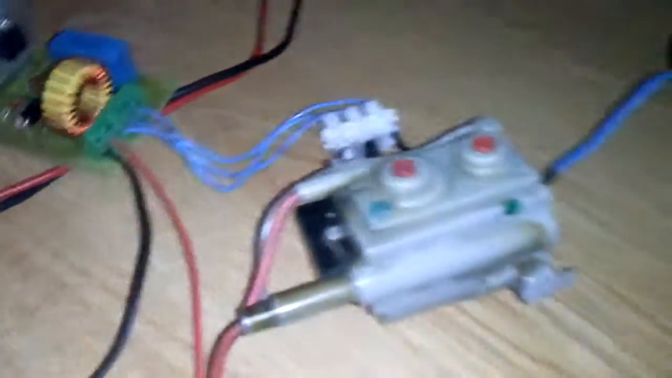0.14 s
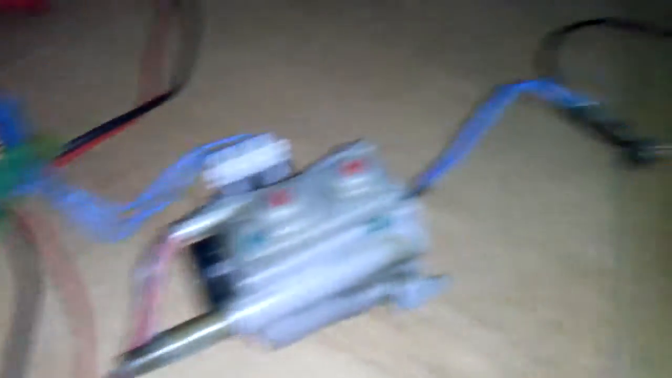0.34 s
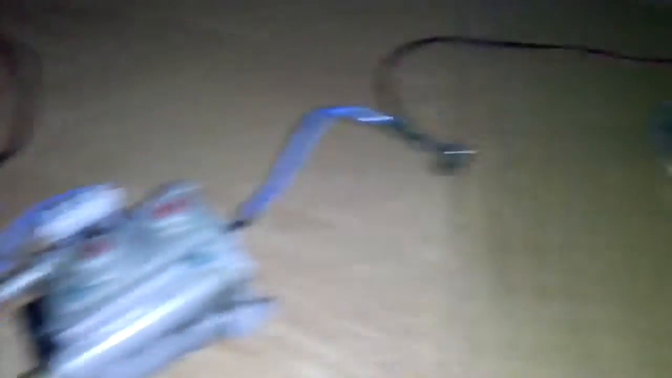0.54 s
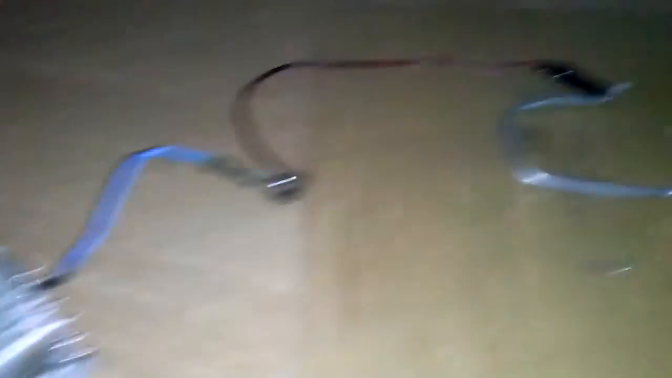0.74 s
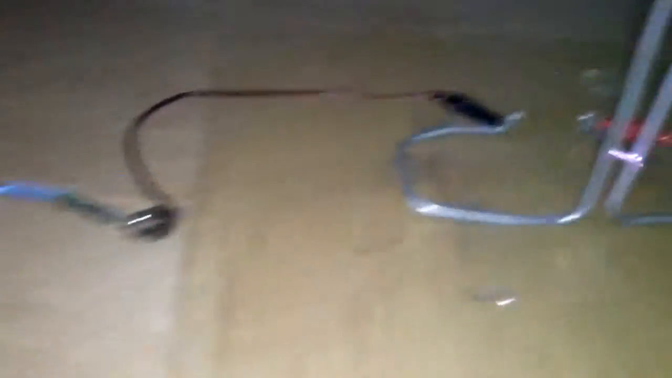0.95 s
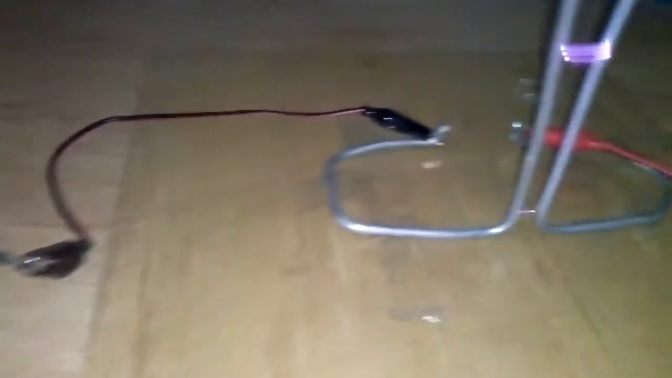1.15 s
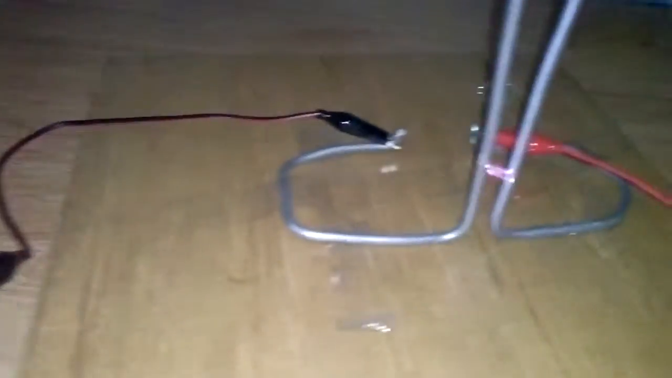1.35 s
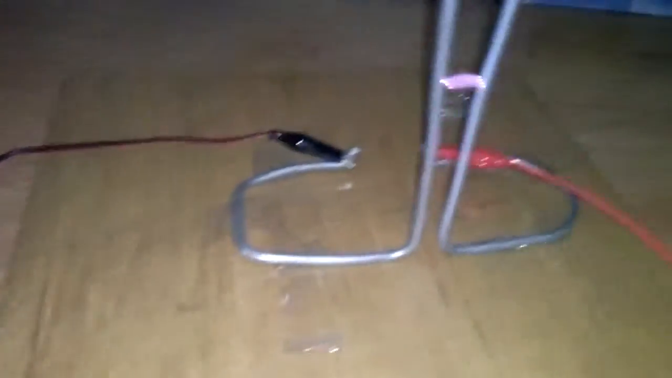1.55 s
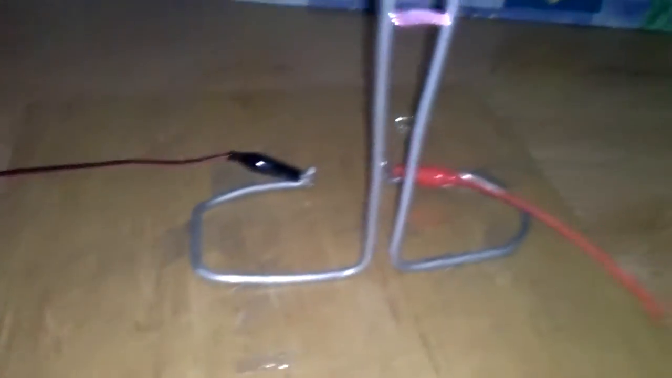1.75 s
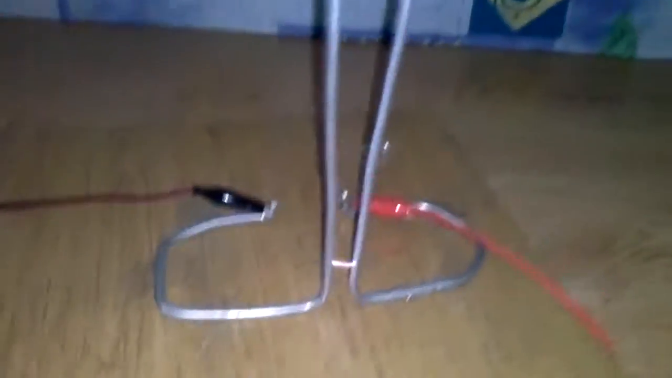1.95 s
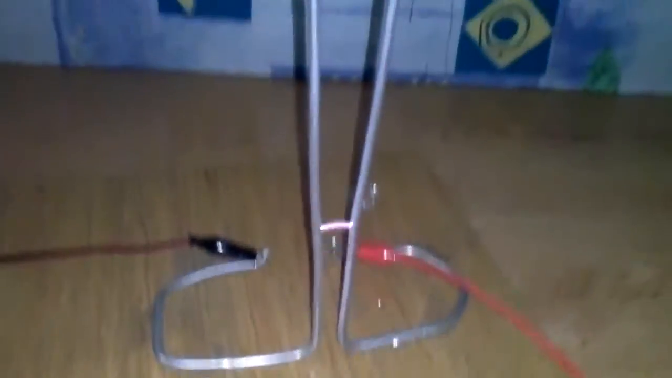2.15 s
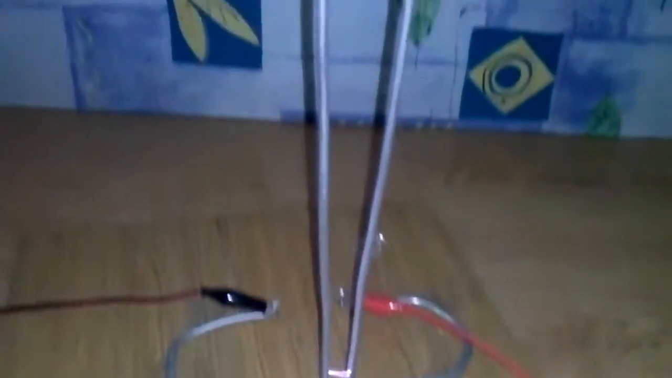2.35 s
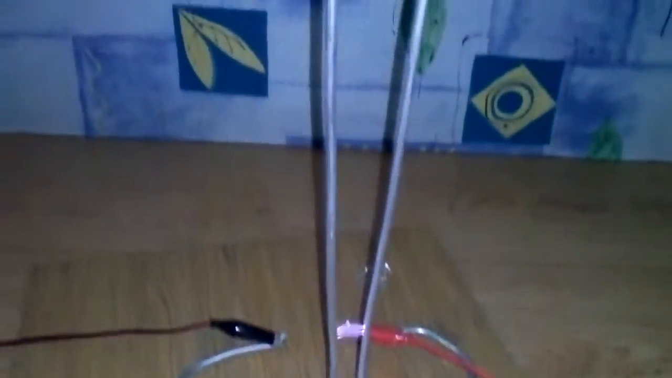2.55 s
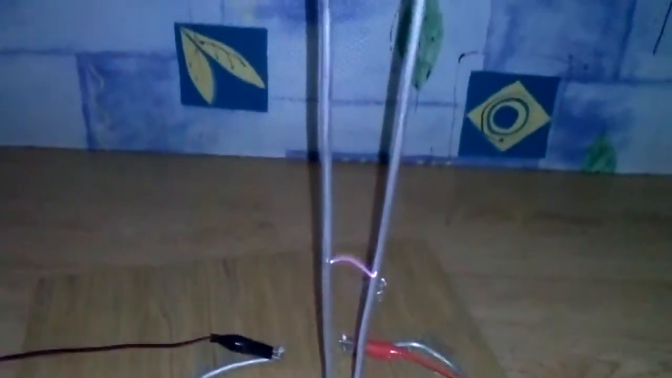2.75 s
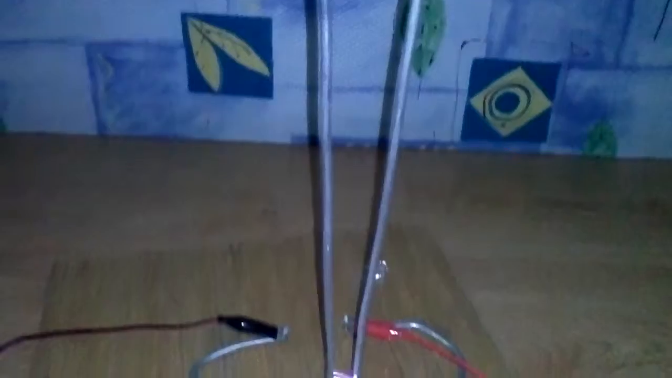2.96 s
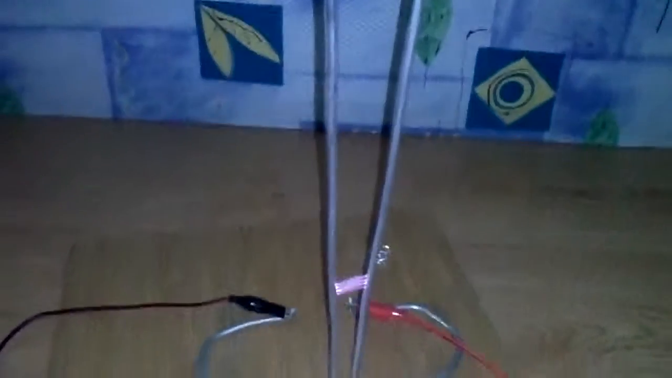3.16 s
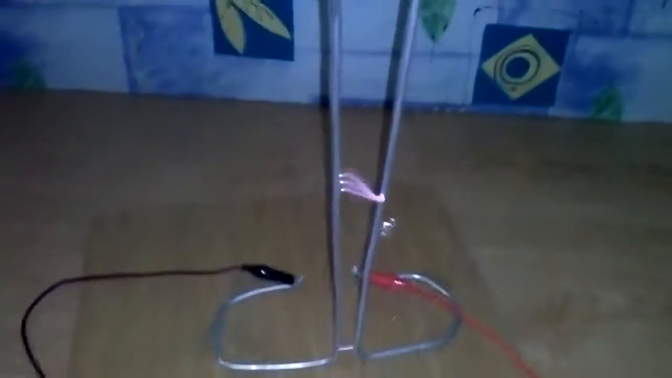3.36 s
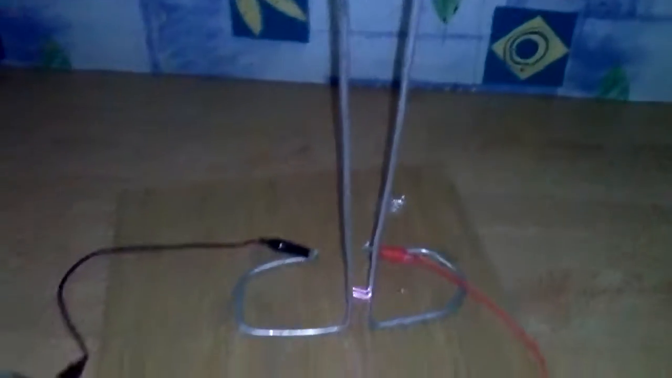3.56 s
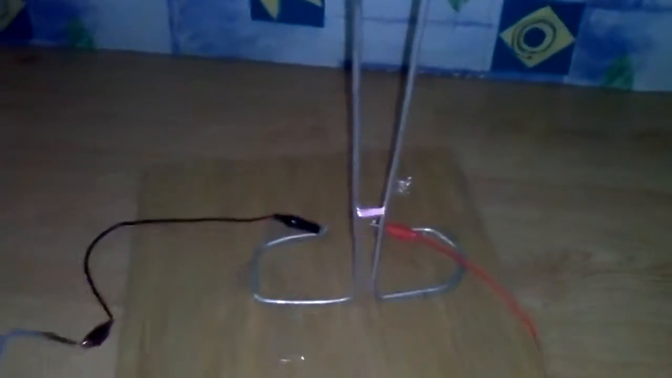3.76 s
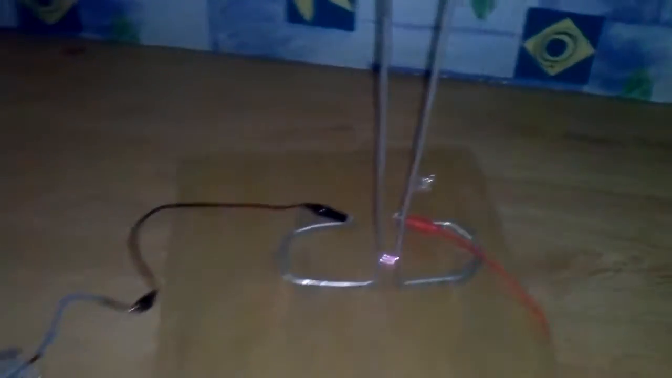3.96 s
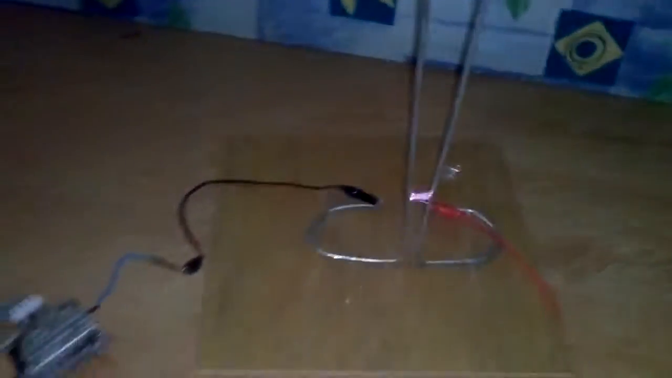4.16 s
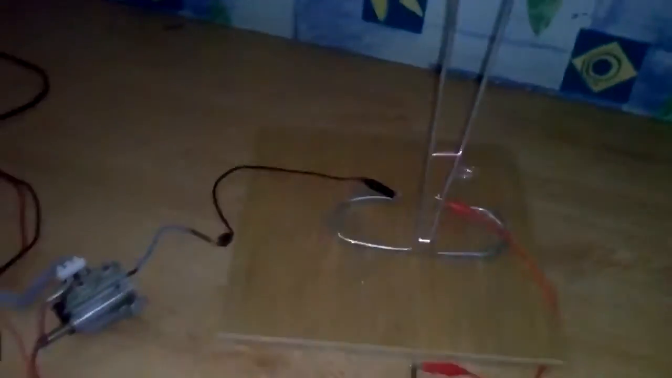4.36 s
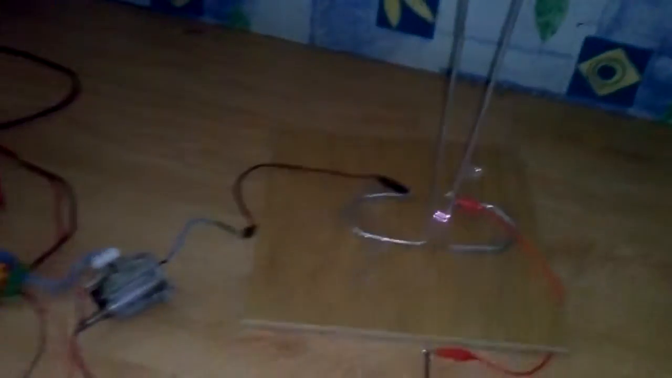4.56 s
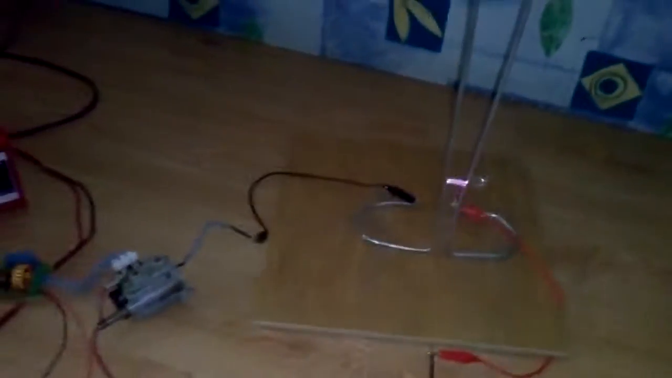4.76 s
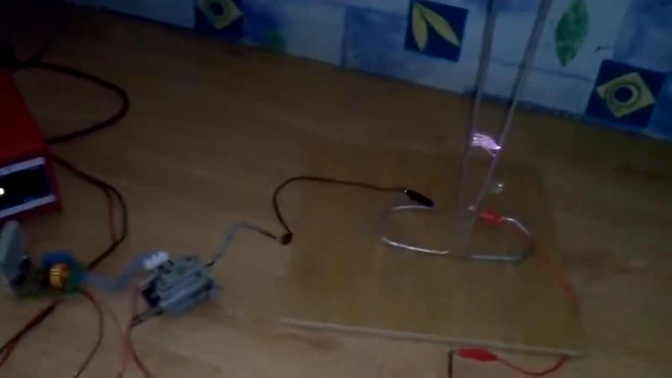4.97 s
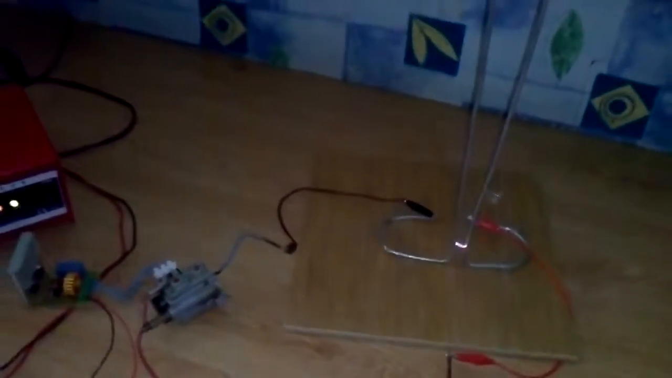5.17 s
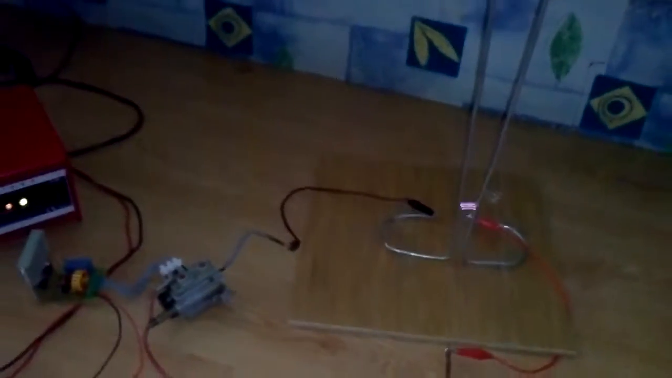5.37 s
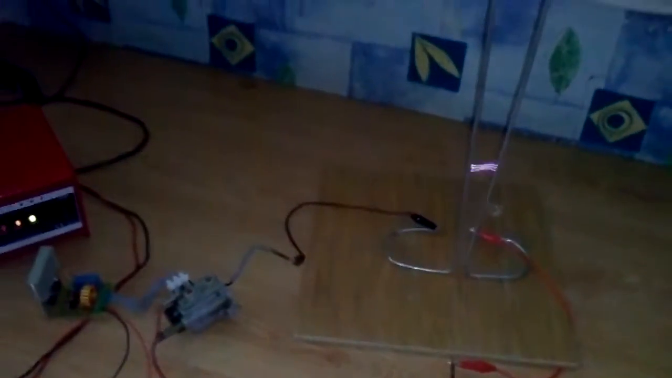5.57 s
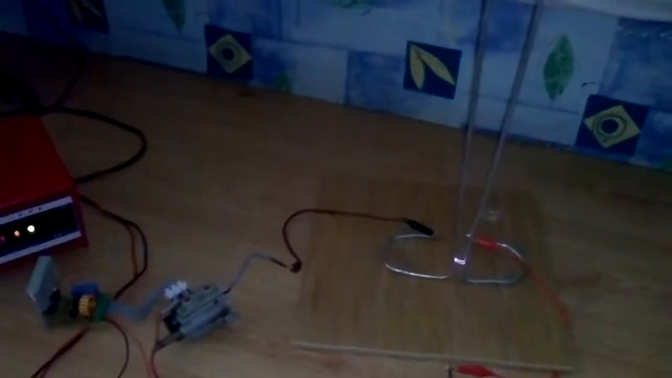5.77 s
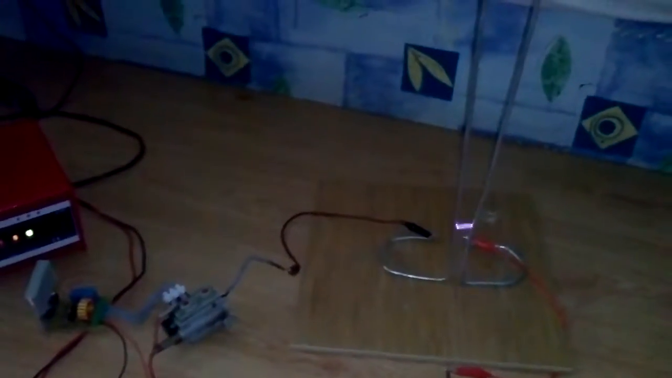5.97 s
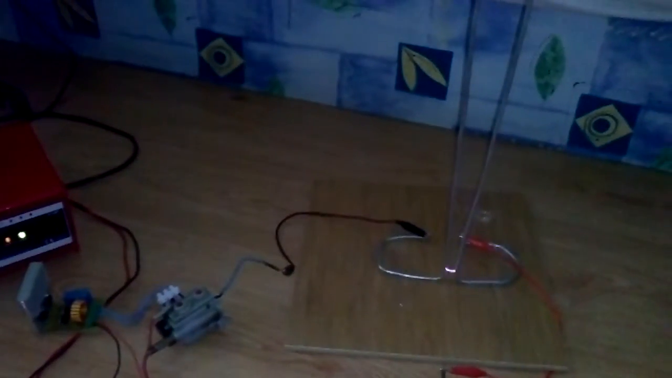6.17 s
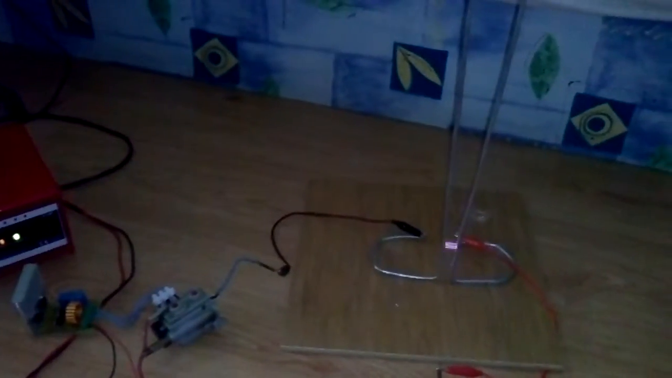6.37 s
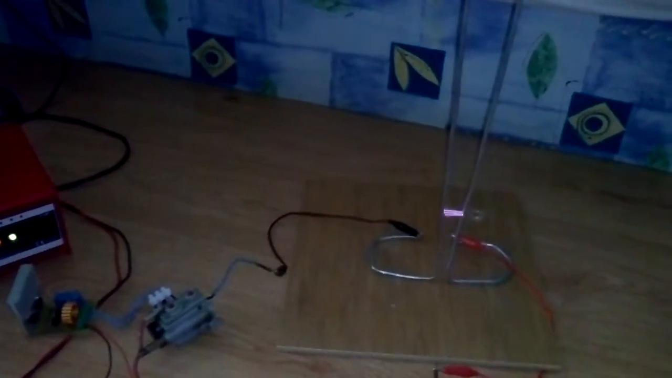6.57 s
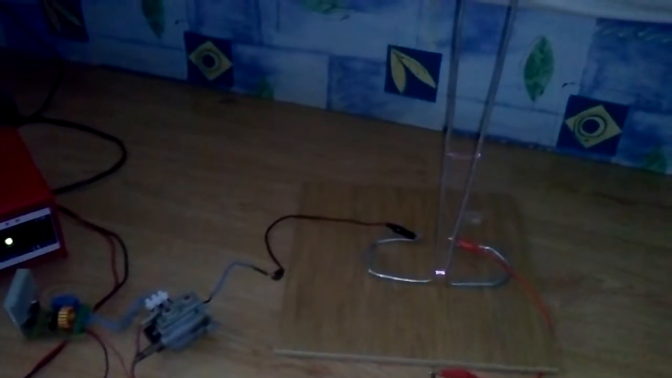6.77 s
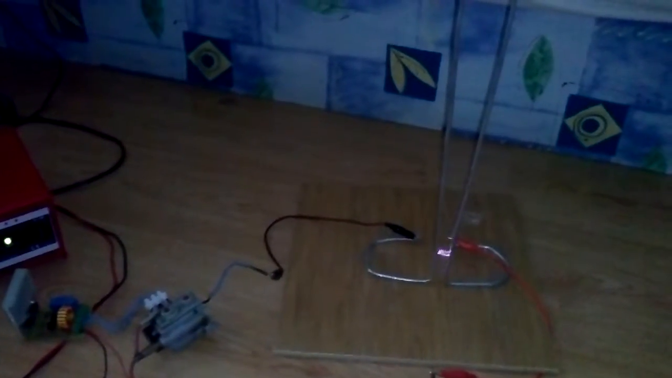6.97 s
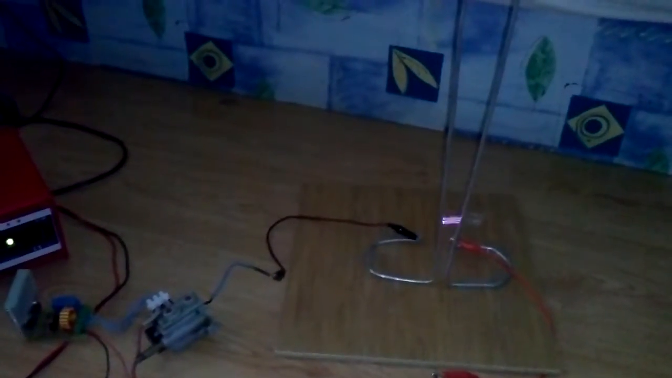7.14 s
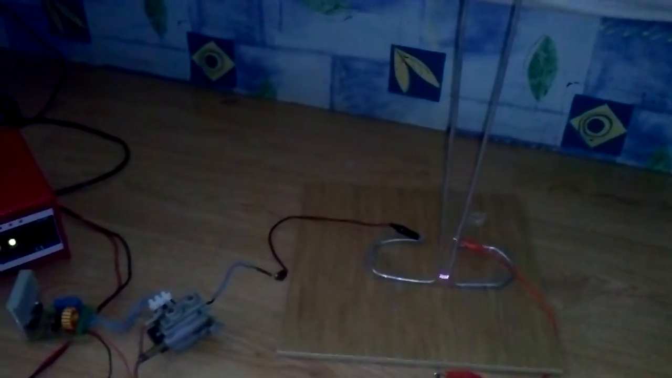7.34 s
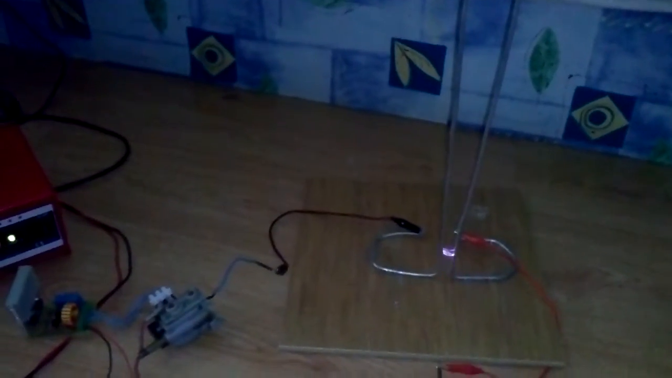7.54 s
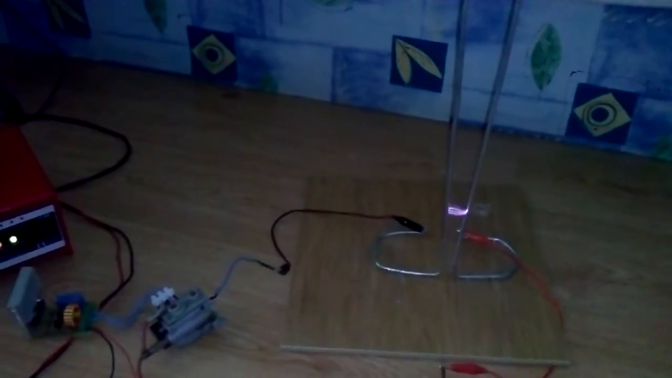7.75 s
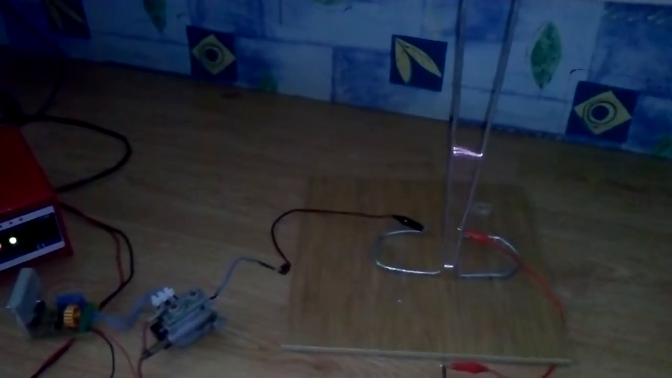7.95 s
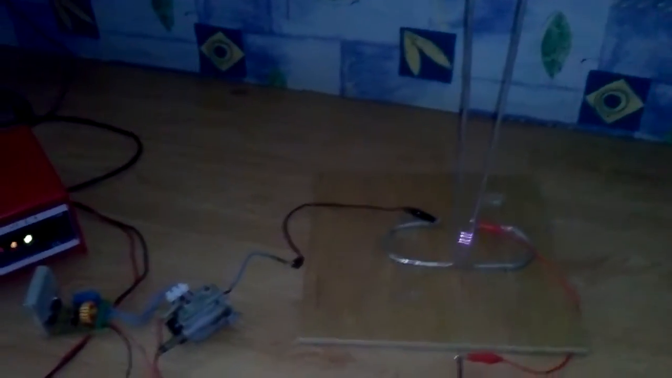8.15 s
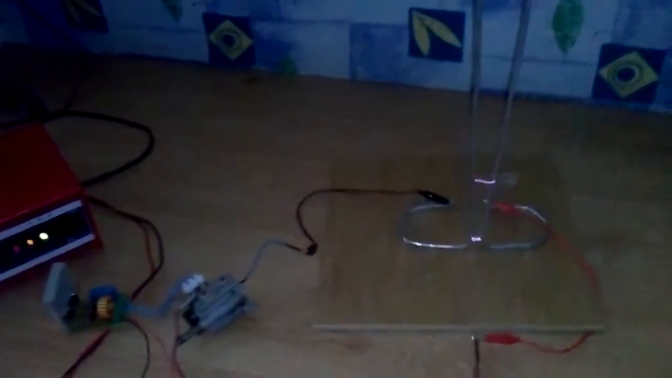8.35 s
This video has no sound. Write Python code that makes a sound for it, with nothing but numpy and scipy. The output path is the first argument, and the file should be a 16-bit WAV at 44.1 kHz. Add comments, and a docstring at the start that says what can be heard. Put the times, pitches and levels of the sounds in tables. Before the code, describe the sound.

An electric arc climbs between two upright wires with a harsh, crackling buzz. It grows louder and fuller as it stretches, sputters, breaks and at once restarts, roughly twice a second. A power supply hums faintly underneath. The sound is close at first, in a small room, then turns a little quieter and more echoing as the handheld microphone moves back, its tone shifting along the way.

```python
"""A harsh, crackling buzz swells, breaks off and starts again: an electric arc climbs two upright wires.
It snaps once every half cycle of the mains; a board, a wall and the room throw each snap back.
As the arc stretches it grows louder and fuller and sputters, then breaks and restarts at the bottom.
The power supply hums underneath. The tone shifts as the small camera that hears it moves and turns."""
import sys
import numpy as np
from scipy import signal
from scipy.io import wavfile
from scipy.ndimage import uniform_filter1d, map_coordinates

SR = 44100
rng = np.random.default_rng(int(sys.argv[2]) if len(sys.argv) > 2 else 0)


def digitize_waveform(pressure):
    """Quantize a signal to 16-bit integers and store it at the path in sys.argv[1].

    Rows of a 2-D input are taken as channels; values are limited to [-1, 1].
    """
    field = np.atleast_2d(pressure).T
    bounded = np.clip(field, -1, 1)
    quanta = np.round(bounded * 32767).astype(np.int16)
    wavfile.write(sys.argv[1], SR, quanta)


N = 370881

# One row for each climb of the arc. Levels are relative; fullness boosts a band around long_pitch_hz.
# strike_s, short_arc_db, lull_after_s, lull_change_db, long_arc_db, flare_db, fullness_db, long_pitch_hz
ARC_CLIMBS = [(-.1, -25.5, 0.27, 6, -22, -18, 6, 2540), (0.328, -22.5, 0.5, 10, -27, -15.5, 15.5, 2400),
              (0.887, -23, 0.31, 0, -19.5, -16.5, 10.5, 3250),
              (1.295, -22.5, 0.28, -2, -22.5, -17.5, 4.5, 3100),
              (1.953, -24, 0.29, 0.5, -24.5, -19, 5, 2720), (2.402, -23.5, 0.24, -0.5, -24, -19.5, 6, 1880),
              (2.884, -23, 0.37, -1.5, -21.5, -19, 6, 3120), (3.513, -23, 0.3, -2.5, -22, -19.5, -1, 2840),
              (3.945, -24.5, 0.32, -0.5, -21.5, -20, 2, 2290),
              (4.49, -24.5, 0.47, 2.5, -23, -20.5, 4, 3180), (5.139, -27.5, 0.36, -0.5, -25, -21, 6, 2970),
              (5.75, -27, 0.31, -1.5, -23.5, -21.5, 1.5, 2800), (6.244, -28, 0.52, 11.5, -35, -20, 8, 2840),
              (6.9, -28, 0.37, 1.5, -25, -22, 9, 2984), (7.445, -28, 0.46, 5.5, -25, -21.5, 9, 2870),
              (8.084, -29, 0.29, 0.5, -21.5, -11, 4, 2820)]
# How far away the camera is: time_s, distance (0 near, 1 far)
CAMERA_DISTANCE = [(0, 0.23), (3.6, 0.011), (5.15, 1), (8.41, 1)]
LAST_BREAK_S, SNAPS_PER_S = 8.7, 100
STRIKES_S = np.append(np.transpose(ARC_CLIMBS)[0], LAST_BREAK_S)  # a climb ends where the next starts
TIME_S = np.arange(N) / SR


def gain_of(db):
    """Turns decibels into a factor to multiply by."""
    return 10 ** (np.asarray(db) / 20)


def evened(x):
    """Scales a signal to an average (rms) level of 1."""
    return x / np.sqrt(np.mean(x ** 2) + 1e-20)


def follow(table, t=TIME_S):
    """Reads a table's columns at the times t, gliding from row to row."""
    times, *columns = np.transpose(table)
    return [np.interp(t, times, column) for column in columns]


def clicks(times_s, sizes):
    """Places a sharp click at each time, even between two samples."""
    at = np.clip(times_s * SR, 8, N - 10)[:, None]
    near = np.floor(at) + np.arange(-7, 9)
    shape = np.sinc(near - at) * np.cos(np.pi * (near - at) / 18) ** 2
    return np.bincount(near.astype(int).ravel(), (shape * sizes[:, None]).ravel(), N)


def colour(x, tone):
    """Shapes the tone by rows of pitch_hz, level_db; the filter rings only after each click."""
    pitch_hz, level_db = np.transpose(tone)
    hz = np.abs(np.fft.fftfreq(4096, 1 / SR))
    curve_db = np.interp(np.log(hz + 1), np.log(pitch_hz), level_db)
    log_gain = np.log(gain_of(np.maximum(curve_db, -100)))
    taps = np.fft.ifft(np.exp(np.conj(signal.hilbert(log_gain)))).real[:2048]
    return signal.oaconvolve(x, taps)[:N]


def delayed(x, ms):
    """Delays a sound by a time that may keep changing."""
    return map_coordinates(x, [np.arange(N) - ms * SR / 1000], order=3)


def resonate(x, hz, width_hz):
    """Lets through a ringing band around the moving pitch hz."""
    turn = np.exp(2j * np.pi * np.cumsum(hz) / SR)
    decay = np.exp(-np.pi * width_hz / SR)
    return 2 * (turn * signal.lfilter([1 - decay], [1, -decay], x / turn)).real


def climb(t):
    """The arc's age in seconds and its height (0 to 1) at the times t."""
    row = np.searchsorted(STRIKES_S, t, "right") - 1
    age_s = t - STRIKES_S[row]
    return age_s, age_s / np.diff(STRIKES_S)[row]


def stages(t):
    """The arc's level_db, fullness_db and pitch_hz at the times t, as each climb runs its course."""
    strike, short_db, lull_after, lull_db, long_db, flare_db, full_db, long_hz = np.transpose(ARC_CLIMBS)
    lull, end, short_hz = strike + lull_after, STRIKES_S[1:], 3200
    steps = [(strike, short_db - 7, -1, short_hz),  # weak start
             (strike + 0.11, short_db, 2, short_hz),  # steady short arc
             (lull - 0.16, short_db, 2, short_hz),
             (lull, short_db + lull_db, 2.5, short_hz),
             (lull + 0.042, long_db, full_db, long_hz),  # long arc
             (end - 0.037, flare_db, full_db, long_hz),  # last flare
             (end - 0.0055, flare_db, -7.5, long_hz)]  # thins out just before the break
    rows = np.stack([np.column_stack(np.broadcast_arrays(*step)) for step in steps], 1).reshape(-1, 4)
    rows[:, 0] = np.maximum.accumulate(rows[:, 0])  # time never runs backward
    return follow(rows, t)


def paths(t):
    """The sound's routes to the moving camera at the times t."""
    # time_s, arrival_in_half_cycle_ms, board_lag_ms_per_s, wall_lag_ms, wall_relative_db
    routes = [(0, 8.85, .55, 2, -8), (.33, 8.85, .9, 2, -8), (1.25, 8.7, .85, 1.95, -7),
              (1.5, 8.7, .72, 1.95, -7), (2.1, 8.7, .93, 1.95, -6), (3.2, 8.6, .93, 1.85, -5),
              (4.2, 8.85, .93, 1.75, -3), (4.9, 8.95, .65, 1.75, 0), (5.3, 9, .75, 1.43, 2),
              (6.3, 8.8, .8, 1.43, 3), (8.41, 8.05, .95, 1.43, 3)]
    return follow(routes, t)


def arrivals():
    """When each snap arrives: earlier as the arc rises toward the camera."""
    beat_s = np.arange(0, N / SR - .01, 1 / SNAPS_PER_S)
    early_ms = .6 * climb(beat_s)[0]
    return beat_s + (paths(beat_s)[0] - early_ms) / 1000


def supply_hum():
    """The supply's transformer hums two low tones that waver a little."""
    # The transformer's tones: pitch_hz, level_db
    tones = [(100, -66.5), (400, -59)]
    waver = evened(uniform_filter1d(uniform_filter1d(rng.standard_normal(N), 3000), 3000))
    hum = sum(gain_of(db) * np.sqrt(2) * np.sin(2 * np.pi * hz * TIME_S) for hz, db in tones)
    return hum * gain_of(1.8 * waver)


def low_buzz():
    """The low part of every snap repeats almost evenly and follows the arc's level only in part."""
    # The buzz's tone in three stretches: pitch_hz, relative_db
    early_tone = [(200, -72.5), (350, -51), (500, -41.5), (600, -40.5), (700, -43.5), (1000, -37.5),
                  (1150, -34.5), (1300, -33.5), (1550, -40), (1800, -35.5), (2000, -33), (2400, -33),
                  (3200, -66.5)]
    middle_tone = [(200, -67.5), (500, -41), (600, -39), (700, -39), (1000, -41), (1150, -35),
                   (1300, -33.5), (1550, -34.5), (1800, -58), (2000, -27.5), (2400, -41.5), (3200, -64)]
    # The last is thin, with almost nothing below 700 Hz
    late_tone = [(200, -120), (600, -98), (700, -42), (800, -57), (900, -39), (1000, -43), (1100, -37),
                 (1200, -59), (1300, -46.5), (1400, -33.5), (1500, -84), (1600, -48.5), (1700, -36.5),
                 (1800, -56), (1900, -63), (2000, -47.5), (2100, -27), (2200, -36.5), (2300, -56),
                 (2400, -89), (3200, -38.5)]
    arrival = arrivals()
    late, = follow(CAMERA_DISTANCE, arrival)
    early = np.clip(1 - (arrival - 1.4) / 0.52, 0, 1)  # the camera swings to the front from 1.4 s
    waver, wander = 2 * uniform_filter1d(rng.standard_normal((len(arrival), 2)), size=4, axis=0).T
    level_db = 57 + 0.66 * (stages(arrival)[0] + 3)
    flutter_db = (1.5 + 1.1 * early) * waver
    fade_db = -2 * climb(arrival)[1]
    size = -gain_of(level_db + flutter_db + fade_db)
    times_s = arrival + .03 * wander / 1000
    blend = [(early, early_tone), ((1 - early) * (1 - late), middle_tone),
             ((1 - early) * late, late_tone)]
    return sum(colour(clicks(times_s, size * share), tone) for share, tone in blend)


def room_tail(x, late_fade_s, early_fade_s, late_db, tails_per_s, count):
    """The room's echoes die away; one tail blends into the next as arc and camera keep moving."""
    out, age_s = np.zeros(N), TIME_S[:SR // 2]
    fade = gain_of(-60 * age_s / early_fade_s) + gain_of(late_db - 60 * age_s / late_fade_s)
    slots = np.arange(110, SR // 2 - 10, 10)  # one echo somewhere in every 10 samples
    for k in range(count):
        echoes = np.zeros(SR // 2)
        echoes[slots + rng.integers(0, 10, len(slots))] = rng.choice([-1., 1.], len(slots))
        echoes *= fade
        away = (tails_per_s * TIME_S - k + count / 2) % count - count / 2
        share = np.cos(np.pi / 2 * np.clip(away, -1, 1))
        out += signal.oaconvolve(x * share, echoes / np.linalg.norm(echoes))[:N]
    return out


def wall_echoes(direct):
    """The wall and what stands near it throw the sound back, later as the arc climbs."""
    wall_ms, wall_db = paths(TIME_S)[2:]
    # Wall, its floor corner and clutter on the bench: extra_lag_ms, relative_db
    surfaces = [(0, 0), (.14, -32), (.65, -6.5), (2.1, -9)]
    lag_ms = wall_ms + .4 * climb(TIME_S)[0]
    return sum(gain_of(wall_db + db - 2) * delayed(direct, lag_ms + ms) for ms, db in surfaces)


def board_echoes(direct):
    """Echoes off the board and the wires' feet lag more as the arc rises, so the tone sweeps down."""
    age_s, height = climb(TIME_S)
    lag_ms = .005 + paths(TIME_S)[1] * age_s
    wood_dulling = signal.butter(1, 11000, fs=SR, output="sos")
    board = signal.sosfiltfilt(wood_dulling, delayed(direct, lag_ms))
    board *= gain_of(-5.5 * height)  # weaker as the arc leaves the board behind
    feet = 0.43 * delayed(direct, 2 * lag_ms + 0.064)
    return board, feet


def camera_body(straight, around):
    """The microphone's opening rings and the camera's body adds an echo; both shift as it turns."""
    # The camera turning in the hand: time_s, ring_hz, ring_relative_db, echo_db, straight_db
    turns = [(0, 7460, 25, -24, -8), (.3, 7900, -16.5, -9, -0.5), (.4, 8700, 10.5, -4, -5.5),
             (.85, 8900, -2, -5, -6), (.93, 8850, -16, -5.5, -1), (1.3, 8420, -18, -5, -0.5),
             (1.42, 8100, -17, -9, -1.5), (1.6, 8100, -20, -8, 1.5), (1.72, 9200, -22, -7, -0.5),
             (1.9, 9200, 2, -27, -5), (2.0, 7250, -2, -12.5, -2), (3.8, 7320, -7, -14.5, -3),
             (4.15, 7500, -36, -14, -2.5), (4.25, 9100, -13, -16, -2), (5.2, 8300, -6, -17, -5),
             (6.5, 8250, 1, -15, -9), (8.41, 8200, -10, -14, -4.5)]
    ring_hz, ring_db, echo_db, straight_db = follow(turns)
    front = gain_of(straight_db) * straight
    echo = gain_of(echo_db) * delayed(front + 0.44 * around, 1000 / ring_hz)
    ring = gain_of(ring_db + 6.5) * resonate(front, ring_hz, width_hz=1200)
    return front + around + echo + ring


def sputter(arrival):
    """Tiny, thin-sounding sparks fire at random, strongest right after each snap."""
    sparks_per_s, fade_ms = 5000, 3.1
    sizes = gain_of(1.86 * np.minimum(rng.exponential(1, N), 5)) * rng.choice([-1., 1.], N)
    sparks = evened(sizes * (rng.random(N) < sparks_per_s / SR))
    thin = signal.lfilter(*signal.butter(1, 1600, "highpass", fs=SR), sparks)
    latest_snap = arrival[np.maximum(np.searchsorted(arrival, TIME_S) - 1, 0)]
    since_ms = 1000 * np.abs(TIME_S - latest_snap)
    return thin * evened(0.22 + np.exp(-since_ms / fade_ms))


def snaps(arrival):
    """One snap each half cycle; the longer the arc, the more it wanders and strikes twice."""
    stretch = climb(arrival)[1] ** 2
    wobble, strength, gap = rng.standard_normal((len(arrival), 3)).T
    first_s = arrival + wobble * (.013 + .055 * stretch) / 1000
    second_s = first_s + (4.9 + 0.258 * gap) / 1000
    breaking = STRIKES_S[np.searchsorted(STRIKES_S, arrival)] - arrival < .015
    uneven_db = (1 + 1.2 * stretch) * np.clip(strength, -3, 1)
    size = -gain_of(uneven_db + 7 * breaking)  # hardest just before a break
    return evened(clicks(first_s, size) + clicks(second_s, 0.44 * size * stretch))


def arc():
    """The arc snaps and sputters, changing in level and fullness as it stretches."""
    # The tone of one snap: pitch_hz, relative_db
    snap_tone = [(250, -87), (410, -56.5), (600, -32.5), (700, -15.5), (848, -13), (877, -11.5),
                 (1360, -3.5), (2160, -1), (3500, -2), (6950, -0.5), (10300, -1), (13400, -64),
                 (22000, -120)]
    arrival, height = arrivals(), climb(TIME_S)[1]
    sparks = snaps(arrival) + (.17 + 0.7 * height ** 3) * sputter(arrival)
    crackle = evened(colour(sparks, snap_tone))
    level_db, fullness_db, pitch_hz = stages(TIME_S)
    crackle += (gain_of(fullness_db) - 1) * resonate(crackle, pitch_hz, width_hz=1650)
    crackle /= np.sqrt(uniform_filter1d(crackle ** 2, SR // 20))  # even out the loudness
    flare_db = 4.5 * np.exp(-((TIME_S - 7.89) / 0.0085) ** 2)  # one brief flare without a break
    return crackle * gain_of(level_db + flare_db)


def scene():
    """Mixes the arc, its echoes, the room (stronger when the camera is far), the buzz and the hum."""
    direct = arc()
    board, feet = board_echoes(direct)
    far, = follow(CAMERA_DISTANCE)
    tail = room_tail(direct + 0.5 * board, late_fade_s=0.71, early_fade_s=0.056, late_db=-3,
                     tails_per_s=1.494, count=10)
    tail *= gain_of(4.5 + 1.56 * far)
    lows = signal.sosfiltfilt(signal.butter(2, 2300, fs=SR, output="sos"), tail)
    tail -= (1 - gain_of(-4)) * lows  # the room sounds thin in the low range
    heard = camera_body(gain_of(3) * (direct + board + feet), wall_echoes(direct) + tail)
    return (heard + low_buzz() + supply_hum())[None]


def record(dry):
    """The amplifier clips peaks; a half-rate converter mirrors a faint copy into the high treble."""
    def cut_above(x, hz, taps):
        """Removes the treble above hz."""
        return signal.oaconvolve(x, signal.firwin(taps, hz, window=("kaiser", 9), fs=SR)[None], "same")

    converted = cut_above(np.clip(dry, -0.93, 0.93), hz=10400, taps=401)
    flipped = converted * (-1.) ** np.arange(N)  # swaps low and high pitches
    mirror = cut_above(flipped, hz=12100, taps=101)
    clipped = np.clip(0.96 * (converted + gain_of(-15) * mirror), -.72, .74)
    return cut_above(clipped, hz=15850, taps=511)


dry = scene()
out = record(dry)
digitize_waveform(out)
```